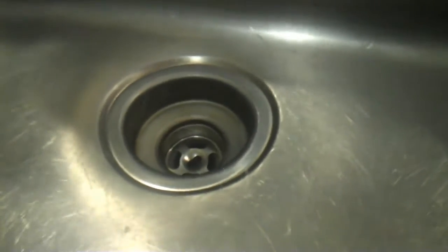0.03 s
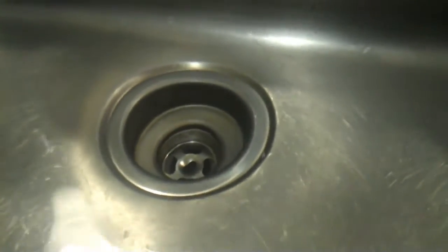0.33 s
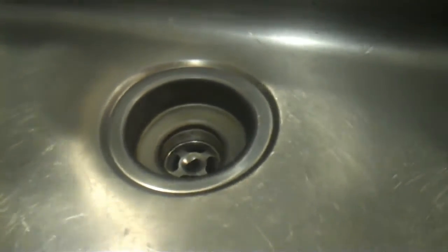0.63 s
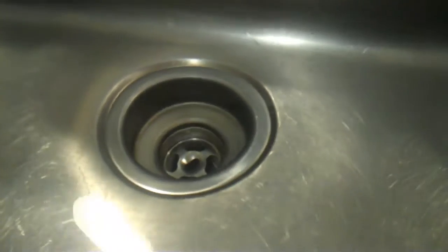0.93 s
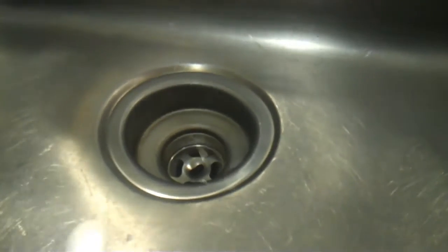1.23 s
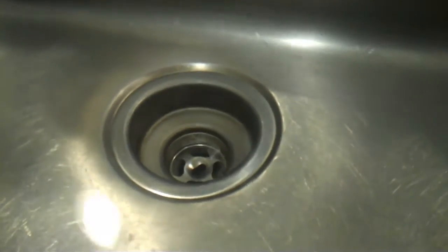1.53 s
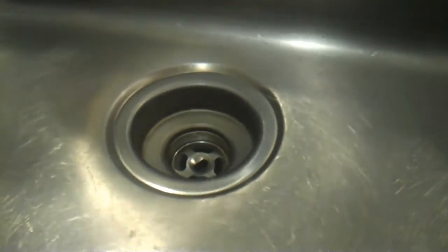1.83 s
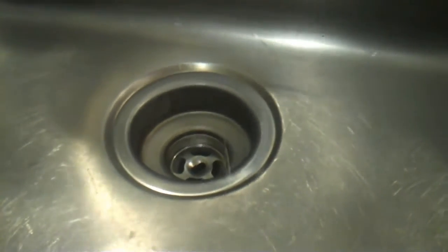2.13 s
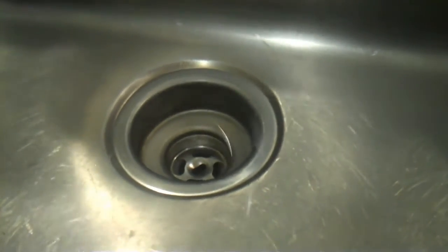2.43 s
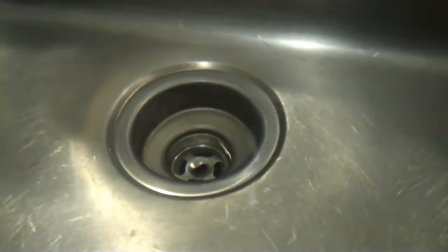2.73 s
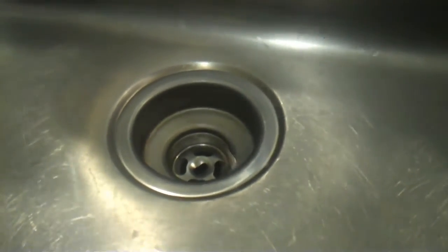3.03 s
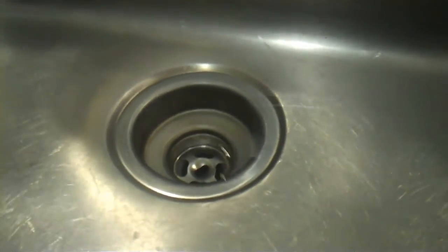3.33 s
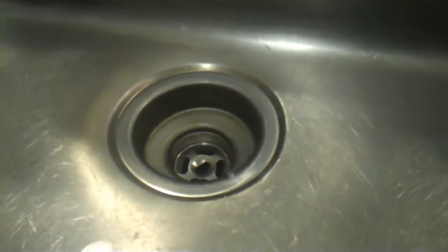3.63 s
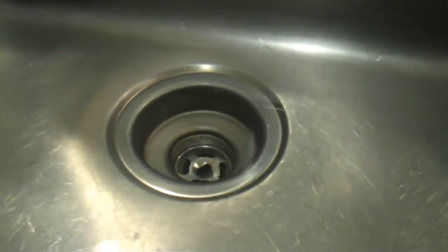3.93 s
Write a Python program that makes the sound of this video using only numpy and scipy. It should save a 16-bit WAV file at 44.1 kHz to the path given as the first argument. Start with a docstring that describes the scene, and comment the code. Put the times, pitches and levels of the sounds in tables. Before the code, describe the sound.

Water gurgles down a steel sink drain, close up in a quiet room. Low, hollow gulps are strongest in the first 0.2 seconds, returning around 0.5, 1 and 1.4 seconds. After 1.5 seconds, a trickle keeps murmuring in the pipe with softer, scattered glugs until 4 seconds. Throughout, tiny bubbles ping and tick at the strainer, and droplets spit and fizz over a faint hiss of water.

```python
"""The last water runs down the drain of a steel sink, heard up close in a quiet room.
Air gulps through the waste pipe and rings its low notes; after a few big gurgles a trickle
keeps it murmuring. At the strainer small bubbles ping and tick, droplets spit and fizz, and
a film of water hisses over the steel. A faint, high whistle sits in the background."""
import sys
import numpy as np
from scipy import signal
from scipy.fft import rfft, irfft
from scipy.io import wavfile
from scipy.ndimage import uniform_filter1d

SR = 44100
rng = np.random.default_rng(int(sys.argv[2]) if len(sys.argv) > 2 else 0)


def put_to_file(sound):
    """Save the sound as 16-bit audio at rate SR, in the file named by the first command-line argument."""
    columns = np.atleast_2d(sound).T  # one column per channel
    safe = np.clip(columns, -1, 1)
    whole_steps = np.round(safe * 32767)
    wavfile.write(sys.argv[1], SR, whole_steps.astype(np.int16))


N = 176400

# notes at which the air in the waste pipe rings: f/Hz, width/Hz, gain/dB
PIPE_NOTES = [(166.5, 5.6, 1), (203.86, 13.8, 9), (289.6, 27, -7.5), (343, 22, -1.5), (386.5, 15, 2.5),
              (465, 28, 1), (570.6, 39, -5), (658, 25, -2)]
# lower notes of the drain's throat: f/Hz, width/Hz, gain/dB
THROAT_LOW_NOTES = [(962, 32.4, 9), (1012, 12, 3.5)]
# higher notes of the drain's throat: f/Hz, width/Hz, gain/dB
THROAT_HIGH_NOTES = [(1410, 65, 2.5), (1564, 26, -1.5), (1913, 45, 2), (2049, 42, -2)]
# how strongly water flows over the steel: t/s, gain/dB
WATER_FLOW = [(0, 9.5), (.25, 2.5), (.6, 7.5), (.85, 5), (1.1, 3), (1.5, 0.5), (2.3, 0.5), (4, 0)]


def undb(db):
    return 10 ** (np.asarray(db) / 20)


def level(x, db):
    """Set a sound's average (RMS) level."""
    return x * undb(db) / np.sqrt(np.mean(x ** 2))


def peak(x, db):
    return x * undb(db) / np.abs(x).max()


def curve(rows):
    """Gain over time from points: t/s, gain/dB."""
    return undb(np.interp(np.arange(N) / SR, *np.array(rows).T))


def add(out, start_s, x):
    """Mix a short sound in at its time."""
    i = max(int(start_s * SR), 0)
    out[..., i:i + x.shape[-1]] += x[..., :max(N - i, 0)]


def pan(x, db):
    """Make stereo, with the left side db above the right."""
    return x * undb(np.array([[db], [-db]]) / 2)


def resonate(x, hz, width):
    """Ring one note; a smaller width (in Hz) rings longer."""
    return signal.lfilter(*signal.iirpeak(hz, hz / width, SR), x)


def ring(x, notes):
    """Ring several notes at once: f/Hz, width/Hz, gain/dB."""
    return sum(undb(db) * resonate(x, hz, width) for hz, width, db in notes)


def colour(x, points, size=4096):
    """Shape a sound's bass and treble through points: f/Hz, gain/dB."""
    hz, db = np.array(points).T
    f = np.maximum(np.fft.rfftfreq(size, 1 / SR), 1)
    gain = undb(np.interp(np.log(f), np.log(hz), db))
    # fold the filter so that it rings only after a hit, never before
    cepstrum = irfft(np.log(gain))
    cepstrum[1:size // 2] *= 2
    cepstrum[size // 2 + 1:] = 0
    response = irfft(np.exp(rfft(cepstrum)))
    return signal.fftconvolve(x, response)[:len(x)]


def wander(per_s):
    """Smooth random drifting, about 1 either way."""
    hold = int(SR / per_s)
    steps = np.repeat(rng.standard_normal(N // hold + 1), hold)
    drift = uniform_filter1d(steps, hold)[:N]
    return drift / drift.std()


def patter(per_s, spread_db):
    """Random tiny hits of uneven size."""
    hit = rng.random(N) < per_s / SR
    size = undb(spread_db * np.clip(rng.standard_normal(N), -2, 2))
    return hit * size * np.sign(rng.standard_normal(N))


def bubble(t, hz, decay_s, rise_per_s=0.66, attack_s=0.00052):
    """A ringing bubble whose pitch rises as it dies away."""
    tone = np.sin(2 * np.pi * hz * t * (1 + rise_per_s * t / 2))
    return tone * np.exp(-t / decay_s) * (1 - np.exp(-t / attack_s))


def flutter(t):
    """Moving water makes a small bubble's loudness waver."""
    return 1 + 0.43 * wander(per_s=240)[:len(t)]


def gulps():
    """Each gulp is a big, fast-fading bubble that rings the pipe, with a splash in the drain's throat."""
    # gulps of air (levels are relative): t/s, level/dB, f/Hz, low splash/dB, high spatter/dB, fade/s
    # (fade is the time the bubble takes to drop by 60 dB)
    air_gulps = [(0.005, -5, 296, -68, -45, 0.013), (0.017, -15, 403, -63, -59, 0.056),
                 (0.032, -5, 305, -49, -58, 0.037), (0.055, -22, 177, -53, -47, 0.04),
                 (0.097, -14, 272, -65, -46, 0.075), (0.107, -15, 275, -53, -61, 0.054),
                 (0.134, -17.5, 174, -55, -48, 0.051), (0.157, -9, 257, -63, -49, 0.028),
                 (0.165, -11.5, 231, -36, -77, 0.034), (0.176, -14, 435, -34, -40.5, 0.022),
                 (0.197, -16, 215, -31, -52, 0.041), (0.322, -19, 201, -45, -40.5, 0.091),
                 (0.378, -21, 214, -47, -48, 0.04), (0.455, -19, 174, -40, -62, 0.021),
                 (0.479, -16, 209, -28.5, -59, 0.063), (0.497, -31, 210, -32, -61, 0.037),
                 (0.543, -26, 198, -40, -65, 0.03), (0.677, -22.5, 199, -54, -65, 0.038),
                 (0.749, -20.5, 219, -55, -67, 0.085), (0.899, -52, 207, -56, -56, 0.083),
                 (0.967, -9.5, 230, -49, -59, 0.017), (0.982, -7.5, 184, -49, -58, 0.035),
                 (0.992, -11.5, 229, -42, -47, 0.045), (1.003, -8.5, 203, -51, -58, 0.04),
                 (1.018, -15, 207, -38, -50, 0.08), (1.04, -19, 190, -58, -56, 0.023),
                 (1.1, -29, 202, -56, -67, 0.11), (1.222, -26, 208, -59, -72, 0.1),
                 (1.249, -27, 386, -48, -42, 0.046), (1.273, -23.5, 350, -60, -50, 0.029),
                 (1.301, -22.5, 207, -60, -47, 0.049), (1.397, -12.5, 161, -38, -43, 0.029),
                 (1.418, -19, 238, -42, -52, 0.11), (1.434, -9, 175, -27, -62, 0.042),
                 (1.441, -22, 380, -48, -58, 0.073), (1.448, -24, 165, -46, -52, 0.026),
                 (1.467, -25, 510, -60, -60, 0.06), (1.47, -16, 164, -62, -50, 0.064),
                 (1.495, -23.5, 171.5, -38, -65, 0.14), (1.961, -22, 224, -50, -60, 0.046),
                 (2.161, -24, 209, -49, -54, 0.099), (2.234, -23.5, 200, -62, -50.5, 0.078),
                 (2.362, -22.5, 198, -41.5, -61, 0.079), (2.583, -20, 205.4, -53, -60, 0.071),
                 (2.837, -22, 218, -60, -52, 0.045), (3.174, -21.5, 225, -67, -56, 0.1),
                 (3.376, -24, 197, -50, -66, 0.077), (3.442, -25.5, 215, -46, -65, 0.16),
                 (3.482, -27, 203, -53, -71, 0.13), (3.688, -21, 201, -69, -55, 0.15),
                 (3.882, -26, 197, -71, -62, 0.29), (3.915, -28, 207, -65, -56, 0.11),
                 (3.956, -24, 347, -52, -55, 0.064)]
    # tone of a gulp before it rings the pipe: f/Hz, gain/dB
    gulp_tone = [(30, -30), (60, -34), (100, -9), (150, 1), (250, 0), (400, 7.5), (590, 4), (780, -17),
                 (1200, -31), (2500, -48), (8000, -43)]
    t = np.arange(SR // 3) / SR
    out = np.zeros(N)
    for start, db, hz, splash_db, spatter_db, fade_s in air_gulps:
        air = bubble(t, hz, decay_s=fade_s / np.log(1000), rise_per_s=1.64, attack_s=0.00082)
        churn = rng.standard_normal(len(t)) * np.exp(-t / 0.021)
        # the bubble and the churning water around it shake the air in the pipe
        body = colour(air + undb(-9.5) * churn, gulp_tone)
        splash = ring(resonate(churn, hz=890, width=210), THROAT_LOW_NOTES)
        spatter = ring(resonate(churn, hz=1640, width=450), THROAT_HIGH_NOTES)
        add(out, start, peak(body + ring(body, PIPE_NOTES), db - 4.5))
        add(out, start, peak(splash, splash_db - 4))
        add(out, start, peak(spatter, spatter_db + 0.5))
    return pan(out, db=0.54)


def trickle():
    """Water keeps dropping into the pipe's bend: the pipe murmurs and its throat babbles."""
    # tone of the drops as they land: f/Hz, gain/dB
    drop_tone = [(25, -50), (45, -37), (70, -17), (100, -9), (135, 2), (170, -1.5), (220, 4), (280, -6),
                 (360, 0), (480, -13), (750, -22.5), (1000, -29.5), (1500, -40.5), (4000, -51),
                 (14000, -96)]
    # strength of the trickle in the pipe: t/s, level/dB
    strength = [(0, -24), (.2, -28), (.42, -39.5), (.52, -31.5), (.61, -41.5), (.7, -34.5), (.92, -35.5),
                (1.28, -31), (1.36, -40), (1.52, -34), (1.6, -40.5), (1.76, -40.5), (1.88, -36), (2.3, -36),
                (2.7, -37), (3.0, -37), (3.45, -34.5), (4, -37.5)]
    drops = colour(patter(per_s=420, spread_db=3), drop_tone)
    murmur = level(drops + ring(drops, PIPE_NOTES), db=0) * curve(strength)
    splashes = resonate(patter(per_s=500, spread_db=4.5), hz=1340, width=1100)
    throat = ring(splashes, THROAT_LOW_NOTES) + undb(-4.5) * ring(splashes, THROAT_HIGH_NOTES)
    babble = level(throat, db=-61.5) * curve(WATER_FLOW)
    return pan(murmur, db=0.33) + pan(babble, db=0)


def film():
    """The thinning film of water hisses over the steel."""
    # tone of the hiss: f/Hz, left gain/dB, right gain/dB
    hiss_tone = [(100, -14, 2), (656, 8, 5), (1130, 7, 7.5), (2000, 0.5, 5), (2420, 2.5, 3),
                 (3530, 1.5, 1.5), (4620, 1, 5), (5550, 5.5, 9.5), (5950, -5, 5.5), (7480, 4.5, -9),
                 (7840, 0.5, -13), (9500, -10, -18), (11300, -14, -24), (13800, -16, -15.5)]
    shared = rng.standard_normal(N)
    sides = [colour(shared + 0.99 * rng.standard_normal(N), np.array(hiss_tone)[:, [0, side]])
             for side in (1, 2)]
    flicker = undb(1.32 * wander(per_s=24.98))
    return level(np.array(sides), db=-54) * flicker * curve(WATER_FLOW)


def cup(x):
    """The strainer's cup rings, with each note at its own strength on the left and right."""
    # notes of the cup: f/Hz, width/Hz, left gain/dB, right gain/dB
    cup_notes = [(2920, 90, 18, 21.5), (3730, 200, -11, 10), (4074, 36, 20, 8.5), (4396, 23, -18, 19),
                 (4720, 120, -19, 10.5), (5070, 45, -20, 12.5), (5344, 59, -4.5, 15.5), (5940, 59, -6, 0),
                 (6000, 110, 3, 6), (6460, 130, -0.5, -17), (7150, 110, 10.5, -25), (7650, 71, 16, -22),
                 (8020, 38.5, 8, -5), (8480, 96, 5, -6), (9020, 65, 1, -32)]
    left = ring(x, [(hz, width, db) for hz, width, db, _ in cup_notes])
    right = ring(x, [(hz, width, db) for hz, width, _, db in cup_notes])
    return np.array([left, right])


def fizz():
    """Many faint sprays come at random, each in its own part of the treble, and ring the cup."""
    # tone of the fizz before it rings the cup: f/Hz, gain/dB
    fizz_tone = [(500, -51), (2000, -3), (4000, -8.5), (5400, 1.5), (7500, -2.5), (9000, -0.5),
                 (11000, 2.5), (14000, -28)]
    decay_s = 0.011
    spray = np.zeros(N)
    for hz in np.geomspace(4000, 8200, 4):
        hits = np.abs(patter(per_s=55, spread_db=6))
        bursts = signal.lfilter([1], [1, -np.exp(-1 / (decay_s * SR))], hits)  # each hit fades away
        spray += resonate(bursts * rng.standard_normal(N), hz, width=1350)
    spray = colour(spray, fizz_tone)
    direct = pan(undb(-9) * spray, db=8.5)
    return level(cup(spray) + direct, db=-56)


def whine():
    """A faint, thin, high whistle in the background."""
    noise = rng.standard_normal((2, N))
    whistle = resonate(noise, hz=11800, width=100)
    return level(resonate(whistle, hz=11930, width=200), db=-75.5)


def crackle():
    """Tiny bubbles of many sizes tick at random."""
    low_hz, high_hz = 3750, 8100
    t = np.arange(SR // 20) / SR
    out = np.zeros(N)
    for when, pitch, strength in rng.random(size=(170, 3)):
        hz = low_hz * (high_hz / low_hz) ** pitch
        tick = bubble(t, hz, decay_s=0.0034)
        add(out, when * N / SR, peak(tick, db=-56 + 6 * strength))
    return pan(out, db=-6.5)


def pings():
    """Small bubbles ring near the cup's lowest note, each at its own pitch, over a faint simmer."""
    # bubbles bursting in the strainer: t/s, relative level/dB, f/Hz
    bursts = [(0.032, -38, 2810), (0.068, -39, 2960), (0.104, -33, 2920), (0.124, -40, 2880),
              (0.143, -41, 2885), (0.185, -39, 2770), (0.326, -36, 2930), (0.396, -30.5, 2914),
              (0.75, -40, 2940), (0.856, -36.5, 2960), (0.977, -34, 2936), (1.141, -42, 2915),
              (1.256, -38, 2940), (1.449, -36, 3000), (1.479, -40.5, 2924), (1.849, -35, 2890),
              (1.897, -41, 2930), (1.973, -39.5, 2960), (2.022, -35, 2950), (2.063, -40.5, 2910),
              (2.09, -41, 2920), (2.582, -37.5, 2893), (2.634, -41, 2880), (3.302, -38.5, 2850),
              (3.354, -43.5, 2830), (3.537, -43.5, 2870), (3.6, -44, 2890), (3.863, -41.5, 2910),
              (3.928, -42.5, 2940)]
    # strength of the simmer in the strainer: t/s, level/dB
    strength = [(0, -52), (.38, -58.5), (.55, -59), (1.0, -60.5), (2.0, -65), (4, -64)]
    simmer_hz = 2914
    t = np.arange(SR // 10) / SR
    simmer = resonate(patter(per_s=110, spread_db=1), simmer_hz, width=200)
    simmer = resonate(simmer, simmer_hz, width=460)
    out = level(simmer, db=0) * curve(strength)
    for start, db, hz in bursts:
        ping = bubble(t, hz, decay_s=0.005, rise_per_s=0.75, attack_s=0.002) * flutter(t)
        add(out, start, peak(ping, db - 4))
    return pan(out, db=-7)


def spits():
    """Each droplet breaks into a short spray that rings the cup, and traps a tiny bubble that plinks."""
    # droplets spitting off the strainer: t/s, spray level/dB, plink level/dB, f/Hz, decay/s
    droplets = [(0.043, -32, -35, 5120, 0.0047), (0.106, -37, -36, 5400, 0.0092),
                (0.375, -36.5, -44, 5400, .008), (0.448, -39.5, -42, 3740, 0.011),
                (0.449, -44, -57, 8960, .008), (0.662, -30, -43.5, 5030, 0.014),
                (0.763, -38, -42, 6180, .009), (0.869, -34, -47, 5220, .009),
                (0.956, -33, -39, 5480, 0.019), (1.042, -32, -45, 5270, 0.0077),
                (1.299, -37, -44.5, 5450, 0.023), (1.6, -42, -43, 5450, 0.031),
                (1.671, -35, -33, 5350, .008), (1.822, -36, -45, 5420, .009),
                (1.866, -43, -45, 5740, 0.008), (2.16, -39, -35, 5430, 0.0064),
                (2.164, -38.5, -42.5, 4070, 0.015), (2.495, -38, -43, 4370, 0.026),
                (2.592, -37, -35, 5490, 0.0064), (2.65, -37, -44, 5470, 0.0068),
                (2.71, -34.5, -42, 5430, 0.016), (2.742, -38, -45, 5950, .009),
                (2.766, -41, -41, 5420, 0.0077), (2.826, -39, -43, 5930, 0.006),
                (2.914, -34.5, -52, 4930, 0.0086), (3.022, -36, -44, 5050, .008),
                (3.251, -40, -47.5, 5510, 0.024), (3.27, -47, -46, 4360, 0.017),
                (3.337, -49, -38.5, 5490, 0.0043), (3.432, -42, -45.5, 6100, 0.0061),
                (3.657, -41, -42.5, 4380, 0.0071), (3.711, -44, -42, 6270, .009),
                (3.743, -42, -47, 5450, 0.007), (3.835, -30, -42, 5540, .009),
                (3.957, -32.5, -40, 5480, .009)]
    attack_s, width_hz = 0.00033, 2100
    t = np.arange(SR // 6) / SR
    out = np.zeros((2, N))
    for start, spray_db, plink_db, hz, decay_s in droplets:
        burst = rng.standard_normal(len(t)) * np.exp(-t / decay_s) * (1 - np.exp(-t / attack_s))
        spray = resonate(resonate(burst, hz, width_hz), hz, 2 * width_hz)
        direct = pan(undb(-14) * spray, db=-20)
        add(out, start, peak(cup(spray) + direct, spray_db))
        plink = bubble(t, hz, decay_s) * flutter(t)
        add(out, start, pan(peak(plink, plink_db), db=-8))
    return out


def basin(pair):
    """A standing wave (sound bouncing across the basin) makes the low middle louder on the right."""
    left, right = undb(-5.5) * resonate(pair, hz=322, width=91)
    return pair + np.array([-left, right])


def from_right(pair, lag_s=0.00009):
    """Sound from the strainer reaches the left side a little later."""
    left, right = pair
    f = np.fft.rfftfreq(N, 1 / SR)
    late_left = irfft(rfft(left) * np.exp(-2j * np.pi * f * lag_s), N)
    return np.array([late_left, right])


def room(x):
    """The basin and room add a short, blurred echo with little bass."""
    fade_s, low_cut_hz, echo_db = 0.093, 700, -5.5
    t = np.arange(SR // 2) / SR
    tails = rng.standard_normal((2, len(t))) * undb(-60 * t / fade_s)
    tails = signal.sosfilt(signal.butter(2, low_cut_hz, "high", fs=SR, output="sos"), tails)
    tails /= np.sqrt(np.sum(tails ** 2, axis=1, keepdims=True))
    return x + undb(echo_db) * signal.fftconvolve(x, tails, axes=1)[:, :N]


def scene():
    """The bright strainer and the deep pipe sound together in the room."""
    strainer = pings() + spits() + crackle() + fizz() + film()
    pipe = gulps() + trickle()
    return room(basin(pipe) + from_right(strainer)) + whine()


def record(dry):
    """Cut off the highest treble."""
    top_hz = 14150
    return signal.sosfilt(signal.ellip(10, .2, 80, top_hz, fs=SR, output="sos"), dry)


dry = scene()
out = record(dry)
put_to_file(out)
```